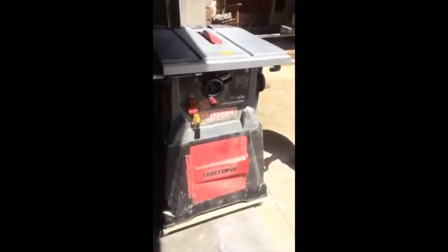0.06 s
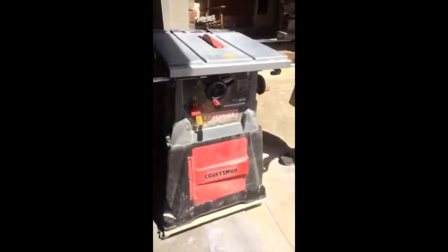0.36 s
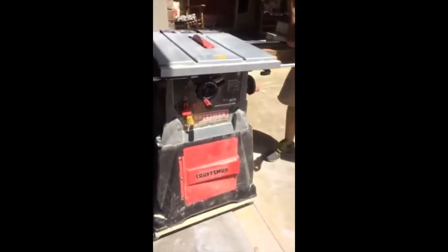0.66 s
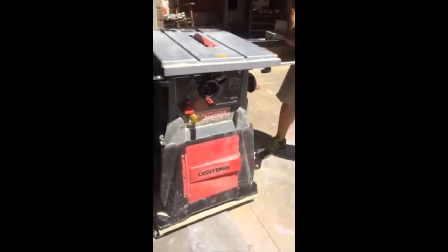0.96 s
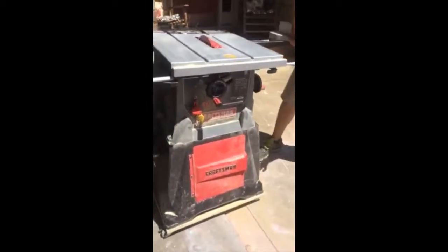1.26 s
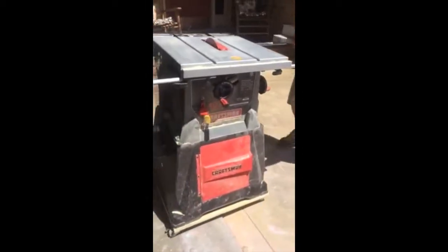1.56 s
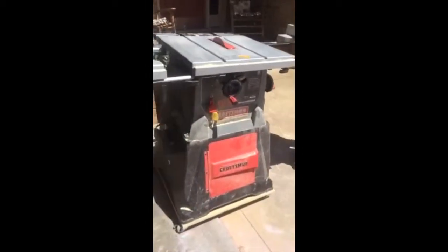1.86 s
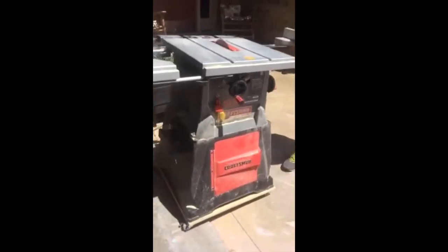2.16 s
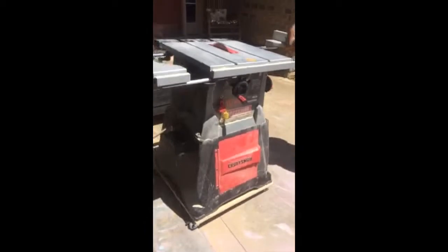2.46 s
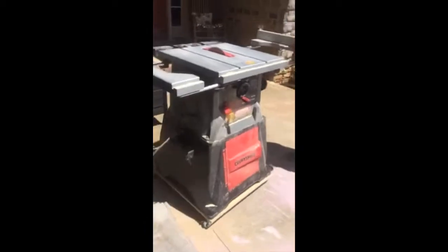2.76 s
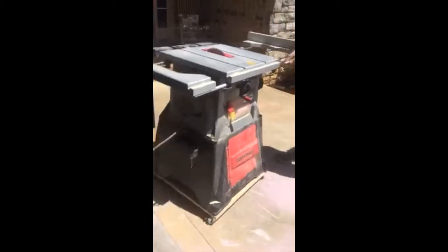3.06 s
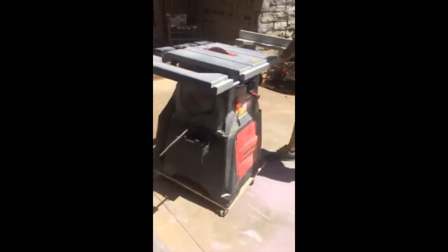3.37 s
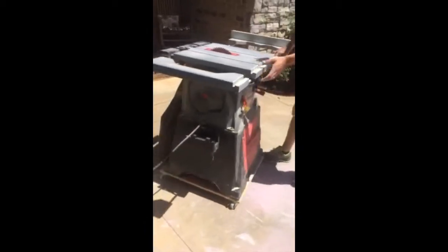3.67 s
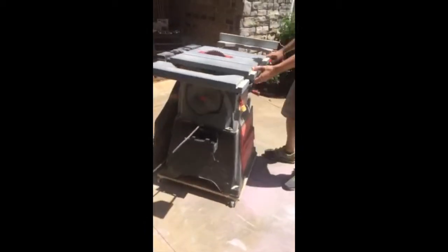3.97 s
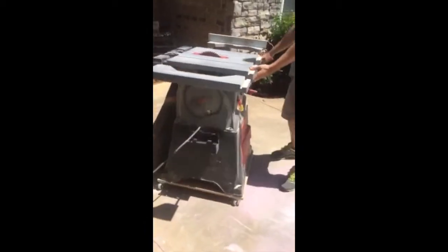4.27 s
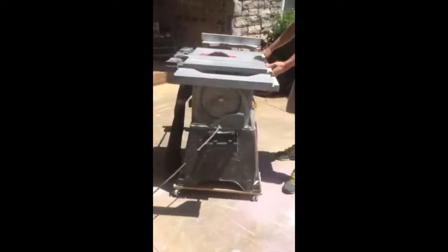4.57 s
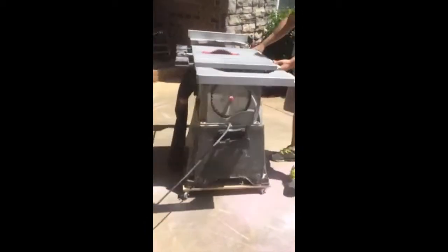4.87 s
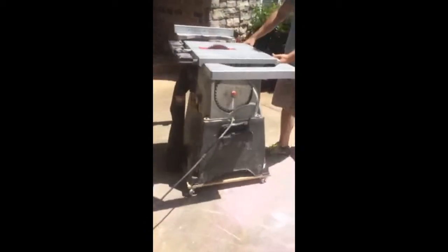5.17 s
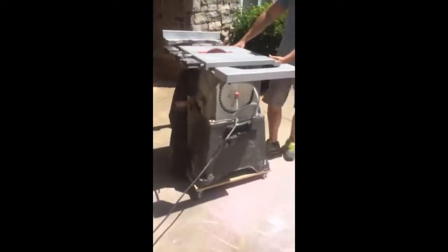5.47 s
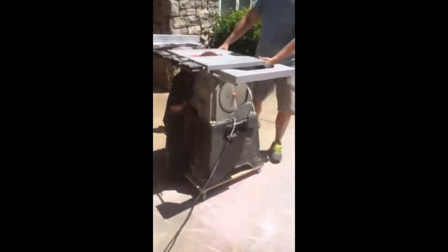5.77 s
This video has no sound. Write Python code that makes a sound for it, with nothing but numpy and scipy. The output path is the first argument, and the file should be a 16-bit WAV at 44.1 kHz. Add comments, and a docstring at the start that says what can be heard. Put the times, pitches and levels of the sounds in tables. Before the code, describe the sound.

A table saw on a wooden dolly rolls across a driveway, clattering and booming over a joint while shoes scuff.

```python
"""Small casters rumble over gritty concrete: a table saw is pushed across a driveway on a wooden dolly.
The wheels shake the hollow stand, swivels rasp and squeak, and loose parts knock. Midway a joint in
the slab sets the whole machine crashing, rattling and booming. Shoes scuff along on sand and the
microphone is nudged; the walls give a short echo over quiet air and a light breeze."""
import sys
import numpy as np
from scipy import signal
from scipy.fft import rfft, irfft, next_fast_len
from scipy.io import wavfile
from scipy.ndimage import uniform_filter1d, map_coordinates

SR = 44100
rng = np.random.default_rng(int(sys.argv[2]) if len(sys.argv) > 2 else 0)


def transcribe(signal):
    """Save signal, clipped to [-1, 1], as a 16-bit WAV file at the path in sys.argv[1]."""
    frames = np.atleast_2d(signal).T
    limited = np.clip(frames, -1, 1)
    pcm = np.round(limited * 32767).astype(np.int16)
    wavfile.write(sys.argv[1], SR, pcm)


N = 265923

# Levels are relative: each layer has its own trim in the mix.
# how hard the wheels roll before and after the joint in the slab: t/s, level/dB
ROLL_IN = [(0.1, -64), (0.42, -75.5), (0.64, -69.5), (0.75, -62.5), (0.89, -53), (1.07, -59), (1.24, -63.5),
           (1.34, -72), (1.54, -64.5), (1.86, -69.5), (2.28, -65), (2.6, -62)]
ROLL_ON = [(3.299, -58), (3.7, -61.5), (3.94, -68), (4.22, -80), (4.44, -65.5), (4.66, -57), (4.84, -58),
           (5.02, -55.5), (5.22, -66.5), (5.44, -61.5), (5.68, -60), (6.03, -63.5)]
# casters drop into the joint: t/s, level/dB
JOLTS = [(2.634, -35), (2.788, -30.5)]
# how each part shakes: level at walking pace/dB, dB per dB of rolling, jolt rise/s (sign ignored),
# level re jolt/dB, decay/(dB/s)
DOLLY_SHAKE = (-57, 0.72, -0.07, -6.5, 24.5)
STAND_SHAKE = (-58, 1.0, -0.08, -2.5, 67)
CASTER_SHAKE = (-68, 1.33, 0.1, -1.5, 85.5)
# casters and loose parts knock: t/s, level/dB, thud offset/dB, snap offset/dB, base decay/s,
# clack cutoff/Hz, ring f/Hz, ring offset/dB
KNOCKS = [(0.094, -52, -20, -22, 0.103, 5000, 1474, -1), (0.187, -46.5, -3, -30, 0.24, 2320, 1026, -8),
          (0.2722, -37, -9, -31, 0.09, 2690, 1774, -3.5), (0.3644, -48, -14, -16, 0.085, 5000, 1090, -3),
          (0.749, -52.5, -14, -7, 0.064, 5000, 1450, -5.5), (0.7631, -33, -14.5, -15, 0.12, 4000, 1405, 0),
          (0.7668, -32, -10.5, -18, 0.11, 5500, 1026, 4.5), (0.786, -45, 0, -20, 0.11, 1500, 496, 8),
          (0.812, -50, 0, 2, .1, 8000, 1440, -2), (0.91, -50, -10, -20, 0.098, 2500, 1800, -4),
          (0.935, -41.5, -7.5, -18, 0.091, 2500, 1333, 4.5),
          (1.0636, -40, -11.5, -4.5, 0.13, 6500, 1840, 2.5),
          (1.3589, -49.5, -15, -4.5, 0.08, 8000, 2130, -1), (1.495, -63.5, 9.5, -22, 0.12, 2000, 470, -0.5),
          (2.6418, -38.5, 5, -21, 0.06, 1510, 251, 10.5),
          (2.6625, -25.5, -9, -10.5, 0.179, 7950, 1845, -3.5),
          (2.722, -39.5, -6, -4.5, 0.23, 8000, 3330, 2), (2.7703, -26.5, -6, -19, 0.28, 8000, 1380, 4),
          (2.79, -29, -17, 15.5, 0.041, 9000, 4090, -13), (2.7984, -22, -6, -10, 0.27, 8000, 1104, -2.5),
          (2.8413, -23.5, -4.5, -7, 0.067, 8000, 1427, -1), (2.873, -34, -16, 9.5, 0.16, 9000, 3520, 0),
          (2.9196, -34.5, -1, -20, 0.31, 8000, 2117, 6), (3.0565, -28, -7.5, -11.5, 0.11, 4500, 1556, 2),
          (3.0834, -36, -2.5, -9, 0.094, 5970, 1541, -9), (3.2004, -42, -19, -13, 0.051, 3950, 1740, -5),
          (3.3828, -33.5, -3.5, -28, 0.081, 1770, 1155, -5.5), (3.755, -47.5, -4, -10, 0.082, 3000, 632, 0),
          (3.7652, -36, -5.5, -11.5, .14, 3200, 1251, 3), (4.545, -50, -1, -26, 0.12, 1590, 910, -3),
          (4.599, -48, -15, -24, 0.12, 1600, 1094, 2.5), (4.6325, -47.5, -9, -12, 0.21, 1970, 1262, -5.5),
          (4.703, -42.5, -4, -14.5, 0.11, 1490, 646, 4.5), (4.766, -42.5, -13, -8, 0.12, 2170, 1263, -2.5),
          (4.912, -50, -5, -11, 0.11, 1700, 934, -1), (4.945, -50, -5.5, -5, .1, 1400, 922, -7),
          (5.3228, -48, -16.5, 6.5, 0.097, 8000, 1170, -5), (5.405, -50, -2.5, -20.5, 0.13, 2020, 932.5, 0)]
# modes of a knocked part: multiple of its ring pitch, level/dB
PART_MODES = [(1.001, 3), (1.391, 0), (1.549, -10)]
# loose metal is thrown up and bounces: t/s, level/dB
BOUNCES = [(2.662, -51), (2.79, -31)]
# lowest modes of the stand: f/Hz, level/dB, t60/s
BOOM_MODES = [(143.4, -7, 0.3), (190.7, -0.5, 0.46), (253, -6, 0.53), (309.4, -5, 0.77)]
# dolly landings and nudges on the microphone: t/s, level/dB, f/Hz, t60/s
BUMPS = [(.003, -31, 137, 0.081), (.024, -35.5, 185, 0.21), (0.021, -41.5, 70.3, 0.355),
         (0.606, -43, 62.7, 0.087), (1.101, -33, 83.7, 0.057), (1.188, -37, 165, 0.072),
         (1.233, -33, 93, 0.12), (1.258, -29, 97.7, 0.069), (2.056, -39.5, 67, 0.141),
         (2.696, -33, 118, 0.17), (2.711, -28, 182, .13), (2.722, -32, 77, 0.19), (2.789, -27, 66.7, 0.51),
         (2.799, -15.5, 101, 0.075), (2.835, -15, 184, 0.073), (2.885, -27.5, 88, 0.14),
         (2.927, -26.5, 123, .17), (2.974, -31, 190, 0.12), (3.044, -32, 90.2, 0.14),
         (3.068, -28, 136, .09), (3.128, -26.5, 95.2, .08), (3.341, -33, 86, 0.074),
         (3.508, -31.5, 84, 0.074), (3.79, -46, 128, 0.25), (4.644, -32, 113, 0.12),
         (5.284, -40.5, 89, 0.166), (5.335, -39.5, 71.4, 0.14), (5.548, -20, 109.4, 0.043),
         (5.579, -43, 67.3, .25), (5.63, -35, 69, 0.081), (5.719, -37.5, 65.7, 0.093)]
# a caster drags sideways: centre t/s, length/s, rasp level/dB, wheel ring re rasp/dB
SWIVELS = [(0.332, 0.1, -62.5, 2), (0.763, 0.033, -48, 0), (0.894, 0.037, -48.5, -5),
           (0.948, 0.0646, -55.5, 10.5), (1.076, 0.25, -67, 13), (1.387, 0.19, -61.5, -2.5),
           (2.23, 0.11, -58.5, -19), (2.46, 0.23, -62, -4), (5.102, 0.065, -60.5, -17.5),
           (5.847, 0.15, -59.5, -16.5)]
# a dry swivel squeaks: centre t/s, length/s, level/dB, f/Hz
SQUEAKS = [(0.87, 0.046, -58.5, 2936), (0.885, 0.0707, -67.5, 3470)]
# wheels judder, soles slide: centre t/s, length/s, level/dB
JUDDERS = [(0.49, 0.13, -68), (1.13, 0.19, -58.5), (1.51, 0.22, -58.5)]
SCUFFS = [(0.345, 0.08, -65), (0.915, 0.232, -69.5), (1.442, 0.056, -70.5), (1.73, 0.0254, -70.5),
          (2.222, 0.0528, -61), (2.285, 0.048, -61.5), (2.52, 0.32, -71), (3.417, .17, -58.5),
          (4.795, 0.075, -66), (5.045, 0.082, -65.5), (5.136, 0.0816, -57.5), (5.312, 0.026, -56.5),
          (5.7, 0.663, -72.5), (5.84, 0.112, -70)]
# single grains crack under a sole: t/s, level/dB
CRACKS = [(0.312, -49), (0.3648, -42), (0.377, -45.5), (2.203, -43), (2.29, -55.5), (3.026, -48),
          (4.768, -49), (5.291, -43)]
# resonances of stand panels, frame and table, dragged wheel, small steel part: f/Hz, width/Hz, level/dB
PANEL_MODES = [(194.6, 17.5, 6), (259, 18, -3), (492, 16, -1), (537, 19, -1), (648, 55, -12.5),
               (1005, 140, 0.5), (1440, 81, -7.5), (3270, 36, 7)]
FRAME_MODES = [(1070, 50, -9), (1385, 25, -3), (2150, 20, -2), (2603, 9, 5), (2793, 9, 2), (3219, 11, 3),
               (3525, 14, 0), (4097, 9, 4), (4500, 10, 1), (4893, 10, 2), (5185, 10, 1), (5560, 30, -9)]
WHEEL_MODES = [(493, 46, 8), (1350, 90, -7.5), (1540, 91, -11.5), (1824, 140, -7.5), (2974, 140, -15)]
STEEL_MODES = [(2840, 290, -9.5), (3170, 280, -5), (3480, 400, 3), (3950, 350, -15)]
# tone of dolly, hollow stand, caster contact, metal, soles, outdoor air and breeze: f/Hz, level/dB
DOLLY_EQ = [(22, -34.5), (40, -19.5), (60, 1), (70, -4.5), (108, -2), (200, -7), (260, -44.5), (440, -120)]
STAND_EQ = [(110, -35), (160, -3.5), (200, -1.5), (240, -4.5), (320, -4.5), (410, -10), (490, -10),
            (680, -9), (820, -18.5), (1300, -38)]
CLACK_EQ = [(500, -15.5), (850, -4), (1050, 0), (1500, 2.5), (2500, -1), (3400, -10.5), (5000, -16),
            (9000, -25), (15000, -26)]
METAL_EQ = [(1500, -15), (3200, -1.5), (5000, -4), (7500, -8.5), (10000, -13.5), (15000, -20)]
SOLE_EQ = [(1000, -6), (2500, -2), (4200, -1.5), (6500, -3), (9000, -5.5), (12000, -7.5), (15500, -8.5)]
AIR_EQ = [(18, -53), (30, -14), (154, -11), (234, -13), (460, -13), (497, -18), (662, -13.5), (905, -19),
          (1270, -18.5), (15000, -36)]
BREEZE_EQ = [(20, -6), (34, -2.5), (55, -3.5), (90, -21.5)]
# reverb between the garage and house walls: f/Hz, t60/s
YARD_DECAY = [(100, 0.45), (500, 0.39), (2000, 0.35), (6000, 0.48), (14000, 0.155)]

WALKING_PACE_DB, JOLT_HOLD_S = -61, 0.059
TURN_START_S, TURN_LENGTH_S, SHIELDED_HZ = 4.5, 0.41, 1970


def rolling():
    """Grit under the wheels shakes the dolly, drums the stand and grinds in the casters."""
    roll_db = np.interp(np.arange(N) / SR, *np.transpose([*ROLL_IN, *ROLL_ON]))
    uneven = np.clip(wobble(rate=45), -1.3, 1.3)  # surface of the slab
    dolly = grains(rate=900, spread_db=4) * shaking(DOLLY_SHAKE, roll_db)
    rumble = coloured(dolly * amp(-1.5 + 2.17 * wobble(rate=14)), DOLLY_EQ)
    stand = grains(rate=900, spread_db=3.5) * shaking(STAND_SHAKE, roll_db)
    drone = coloured(stand * amp(-2.5 + 2.3 * uneven), STAND_EQ, panels=0.52)
    crushed_grit = amp(roll_db - 16) * grains(rate=26, spread_db=2)
    casters = grains(rate=1100, spread_db=2.5) * shaking(CASTER_SHAKE, roll_db)
    grind = coloured(crushed_grit + casters * amp(-5 + 2 * uneven), CLACK_EQ, panels=0.81)
    # near the end the stand hides the grinding caster and dulls it
    hidden = np.clip((np.arange(N) / SR - TURN_START_S) / TURN_LENGTH_S, 0, 1)
    return rumble + drone + (1 - hidden) * grind + hidden * softened(grind, SHIELDED_HZ)


def shaking(part, roll_db):
    """How strongly a part vibrates: it follows the rolling and is thrown about by each jolt."""
    walking_db, slope, rise_s, jolt_db, db_per_s = part
    thrown = sum(amp(db + jolt_db) * jolt(s, rise_s, db_per_s) for s, db in JOLTS)
    return np.hypot(amp(walking_db + slope * (roll_db - WALKING_PACE_DB)), thrown)


def jolt(s, rise_s, db_per_s):
    """Envelope of the shaking after a drop: it builds and, after a short hold, dies away."""
    t = np.maximum(np.arange(N) / SR - s, 0)
    return (1 - np.exp(-(t / rise_s) ** 2)) * amp(-db_per_s * np.maximum(t - JOLT_HOLD_S, 0))


def knocks():
    """Each contact clacks, thuds in the stand and rings the part; hard ones add a metallic snap."""
    clack, thud, snap, ring = np.zeros((4, N))
    for s, db, thud_db, snap_db, decay_s, top_hz, ring_hz, ring_db in KNOCKS:
        add(ring, s - .001, amp(db + ring_db - 6.5) * hollow_ring(ring_hz))
        add(clack, s - .002, amp(db - 7.5) * softened(chatter(decay_s * 0.86, rise_s=0.0014), top_hz))
        add(thud, s - .002, amp(db + thud_db - 1) * chatter(decay_s * 1.81, rise_s=0.00076))
        add(snap, s - .001, amp(db + snap_db - 9.5) * chatter(decay_s * 0.446, rise_s=0.00044))
    body = coloured(clack, CLACK_EQ, panels=0.54) + coloured(thud, STAND_EQ, panels=0.35)
    return body + coloured(snap, METAL_EQ) + ring


def chatter(t60, rise_s):
    """The noise burst of one contact: fast attack, short tail."""
    t = np.arange(SR // 3) / SR
    return rng.standard_normal(len(t)) * amp(-60 * t / t60) * (1 - np.exp(-t / rise_s))


def hollow_ring(ring_hz, width_hz=34):
    """A knocked part rings briefly in damped modes of unsteady pitch, peak 1."""
    t = np.arange(SR // 6) / SR
    drift = uniform_filter1d(rng.standard_normal((len(PART_MODES), len(t))), size=60)
    mode_hz = ring_hz * np.array(PART_MODES)[:, :1] * (1 + 0.28 * drift)
    phases = 2 * np.pi * np.cumsum(mode_hz, axis=1) / SR
    modes = sum(amp(db) * np.sin(phase) for (_, db), phase in zip(PART_MODES, phases))
    ring = modes * np.exp(-np.pi * width_hz * t) * (1 - np.exp(-t / 0.0015))
    return ring / np.abs(ring).max()


def rattle(mode_count=300, t60=0.058):
    """Fence and guard bounce on the table in flurries; each touch rings them and the frame."""
    t = np.arange(SR // 6) / SR
    mode_hz = 2500 * 6 ** ((np.arange(mode_count)[:, None] + rng.random((mode_count, 1))) / mode_count)
    modes = np.sin(2 * np.pi * (mode_hz * t + rng.random((mode_count, 1)))).sum(0) * amp(-60 * t / t60)
    bouncing = sum(amp(db - 5.5) * jolt(s, rise_s=0.003, db_per_s=182) for s, db in BOUNCES)
    flurries = grains(rate=520, spread_db=1.5) * amp(2.5 * np.clip(wobble(rate=110), -1.3, 1.3))
    touches = unit(flurries) * bouncing
    ring = signal.fftconvolve(touches, modes / np.linalg.norm(modes))[:N]
    blows = np.zeros(N)  # the landings themselves strike the frame
    for s, db in BOUNCES:
        add(blows, s + 0.0028, amp([db + 21.5]))
    frame = ringing(amp(-8) * touches + blows, FRAME_MODES)
    return coloured(0.74 * touches + 0.53 * ring, METAL_EQ) + frame


def boom(start_s=2.835):
    """The heaviest landing rings the hollow stand in its lowest modes."""
    track, t = np.zeros(N), np.arange(SR) / SR
    modes = sum(amp(db - 60 * t / t60) * np.sin(2 * np.pi * hz * t) for hz, db, t60 in BOOM_MODES)
    add(track, start_s, amp(-31) * modes * (1 - np.exp(-t / 0.002)))
    return track


def bumps():
    """Dull, heavily damped thumps as the dolly lands or the microphone is nudged."""
    track, t = np.zeros(N), np.arange(SR // 3) / SR
    attack = 1 - np.exp(-t / 0.0033)
    for s, db, hz, t60 in BUMPS:
        add(track, s, amp(db - 60 * t / t60) * np.sin(2 * np.pi * hz * t) * attack)
    return signal.sosfilt(signal.butter(N=2, Wn=32, btype="high", fs=SR, output="sos"), track)


def swivels():
    """A wheel dragged sideways rasps in short slips that ring its resonances."""
    slips = grains(rate=1100, spread_db=-1) * amp(2.64 * np.clip(wobble(rate=78), -1.3, 1.3))
    rasp = coloured(slips * strokes(row[:3] for row in SWIVELS), CLACK_EQ, panels=0.23)
    drag = strokes((s, length, db + ring_db) for s, length, db, ring_db in SWIVELS)
    return amp(-5.5) * (rasp + ringing(slips * drag, WHEEL_MODES))


def judder(panel_hz=194, wander_hz=5.6):
    """Juddering wheels keep the stand's lowest panel mode humming, unsteady in pitch and strength."""
    pitch = panel_hz + wander_hz * wobble(rate=22)
    hum = unit(np.sin(2 * np.pi * np.cumsum(pitch) / SR))
    return strokes(JUDDERS) * amp(3.6 * wobble(rate=48)) * hum


def squeaks(rise_hz_per_s=1500, jitter_hz=44.6):
    """The dry swivel bearing squeaks faintly, rising and unsteady."""
    track, t = np.zeros(N), np.arange(N) / SR
    for s, length, db, hz in SQUEAKS:
        pitch = hz + rise_hz_per_s * np.clip(t - s, -length, length) + jitter_hz * wobble(rate=620)
        track += strokes([(s, length, db)]) * np.sin(2 * np.pi * np.cumsum(pitch) / SR)
    return track


def clink(centre_s=5.321, length_s=0.016, db=-56):
    """A small steel part chatters in one short tick."""
    return ringing(grains(rate=3500, spread_db=7) * strokes([(centre_s, length_s, db)]), STEEL_MODES)


def scuffs(crack_t60=0.0111):
    """Sand hisses under each stroke of a sliding sole; coarse grains crunch and crack."""
    sand = grains(rate=9000, spread_db=1) * amp(-1 + 1.34 * wobble(rate=260))
    coarse = amp(-9) * grains(rate=160, spread_db=10)
    cracks, t = np.zeros(N), np.arange(SR // 30) / SR
    for s, db in CRACKS:
        add(cracks, s - .001, amp(db - 8.5 - 60 * t / crack_t60) * rng.standard_normal(len(t)))
    return coloured(strokes(SCUFFS) * (sand + coarse) + cracks, SOLE_EQ)


def yard(x, predelay_s=0.012):
    """The garage and house walls answer, the highest treble dying first."""
    hz, t, noise = signal.stft(rng.standard_normal(SR // 2), SR, nperseg=256)
    tail = signal.istft(noise * amp(-60 * t / along(YARD_DECAY, hz)[:, None]), SR, nperseg=256)[1]
    response = np.concatenate([np.zeros(round(predelay_s * SR)), tail / np.linalg.norm(tail)])
    return signal.fftconvolve(response, x)[:N]


def outdoors():
    """A bed of quiet air, with a light breeze fluttering on the microphone."""
    air = amp(-67) * coloured(rng.standard_normal(N), AIR_EQ)
    gusts = amp(-70.5 + 2.8 * np.tanh(wobble(rate=7.8)))
    return air + gusts * coloured(rng.standard_normal(N), BREEZE_EQ)


def amp(db):
    """Decibels to gain."""
    return 10 ** (np.asarray(db) / 20)


def unit(x):
    """Scale to rms 1."""
    return x / np.sqrt(np.mean(x ** 2) + 1e-20)


def along(points, hz):
    """Interpolate (f/Hz, value) points on a log frequency axis."""
    f, v = np.transpose(points)
    return np.interp(np.log(hz + 1), np.log(f + 1), v)


def wobble(rate):
    """A smooth random curve, rate knots a second."""
    return map_coordinates(rng.standard_normal(int(N * rate / SR) + 4), [np.arange(N) * rate / SR])


def grains(rate, spread_db):
    """Tiny impacts of random timing and size, about rate a second, rms 1."""
    sizes = amp(spread_db * np.clip(rng.standard_normal(N), -2, 2)) * rng.choice([-1, 1], N)
    return unit(sizes * (rng.random(N) < rate / SR))


def strokes(rows):
    """Envelope that swells and fades for each row of centre t/s, length/s, level/dB."""
    t = np.arange(N) / SR
    return sum(amp(db) / (1 + np.abs(2 * (t - s) / length) ** 4.5) for s, length, db in rows)


def add(track, s, sound):
    """Mix a sound into the track at time s."""
    start = max(0, round(s * SR))
    track[start:start + len(sound)] += sound[:N - start]


def coloured(x, eq, panels=0):
    """Broad EQ at unit power gain; panels sets how far the stand's resonances stick out."""
    size = 2 * next_fast_len(len(x) // 2 + 4096)
    hz = np.fft.rfftfreq(size, 1 / SR)
    low, high = eq[0][0], eq[-1][0]
    gain = amp(along(eq, hz)) / (1 + (low / (2 * hz + 1)) ** 4) / (1 + (hz / (2 * high)) ** 4)
    peaks = sum(amp(db) / (1 + (2 * (hz - centre) / width) ** 2) for centre, width, db in PANEL_MODES)
    gain *= 1 + panels * peaks
    # minimum phase, so nothing rings ahead of a hit
    cepstrum = irfft(np.log(unit(gain) + 1e-6))
    cepstrum[1:size // 2] *= 2
    cepstrum[size // 2 + 1:] = 0
    return irfft(rfft(x, size) * np.exp(rfft(cepstrum)), size)[:len(x)]


def softened(x, top_hz):
    """Roll off the treble above top_hz."""
    return signal.sosfilt(signal.butter(N=5, Wn=top_hz, fs=SR, output="sos"), x)


def ringing(x, modes):
    """Ring resonances (f/Hz, width/Hz, level/dB) with x, at unit power gain."""
    t = np.arange(SR // 3) / SR
    body = sum(amp(db) * width * np.exp(-np.pi * width * t) * np.sin(2 * np.pi * hz * t)
               for hz, width, db in modes)
    return signal.fftconvolve(x, body / np.linalg.norm(body))[:len(x)]


def scene():
    """Mono mix: machine and shoes with the yard's reverb, dry thumps and the outdoor bed."""
    machine = rolling() + judder() + swivels() + squeaks() + knocks() + boom() + clink() + rattle()
    direct = machine + scuffs()
    bed = outdoors()
    return (direct + amp(-11.5) * yard(direct) + bumps() + bed)[None]


def record(dry, top_hz=15450):
    """A brick-wall low-pass cuts everything above top_hz."""
    size = next_fast_len(N + SR // 2)
    passband = np.fft.rfftfreq(size, 1 / SR) < top_hz
    return irfft(rfft(dry, size) * passband, size)[:, :N]


dry = scene()
out = record(dry)
transcribe(out)
```